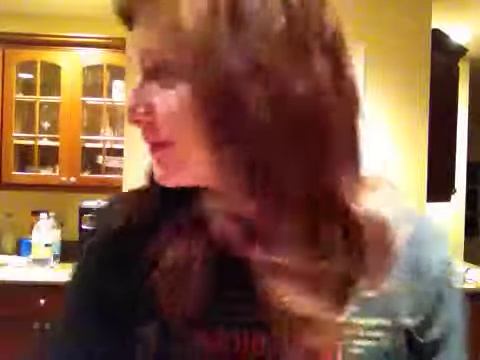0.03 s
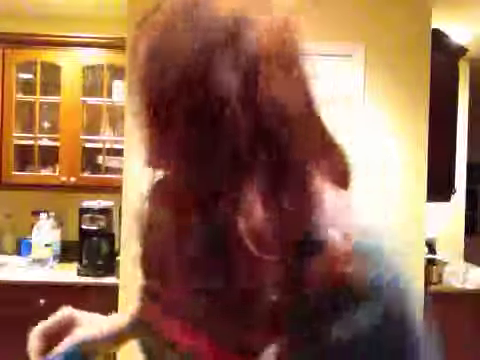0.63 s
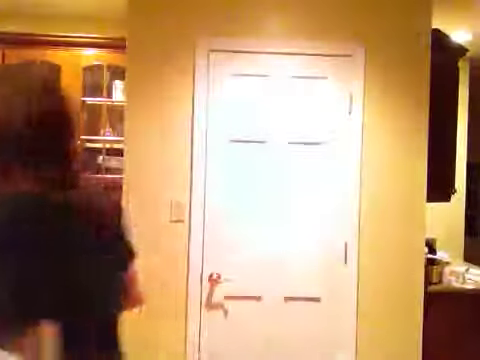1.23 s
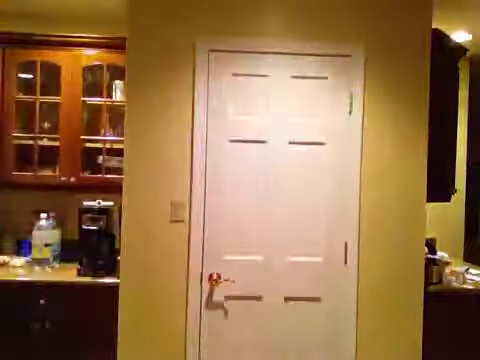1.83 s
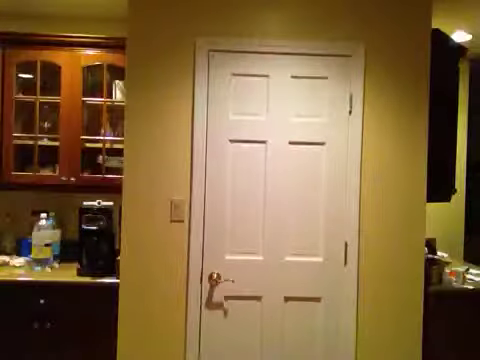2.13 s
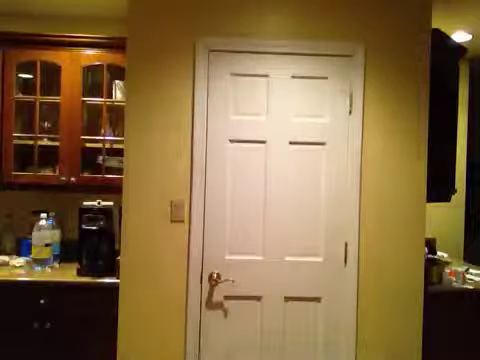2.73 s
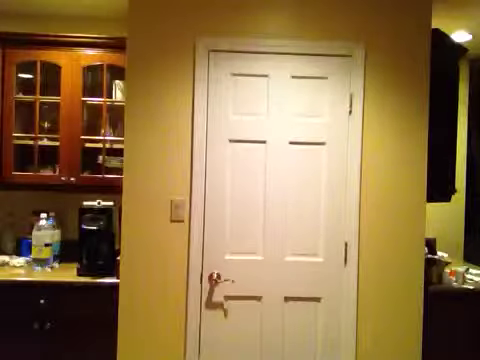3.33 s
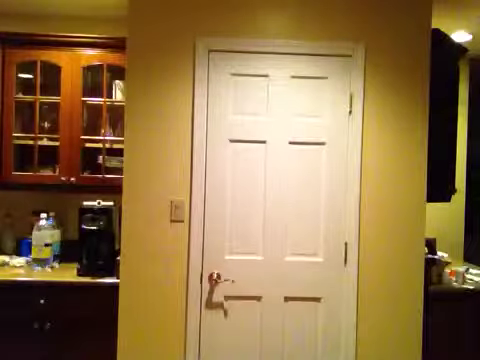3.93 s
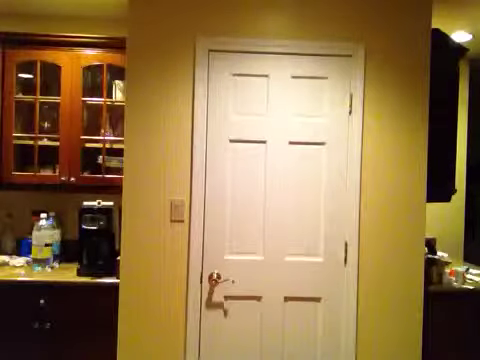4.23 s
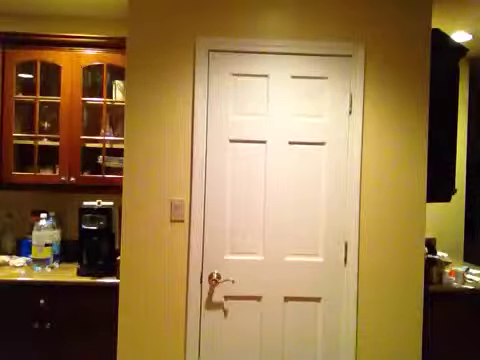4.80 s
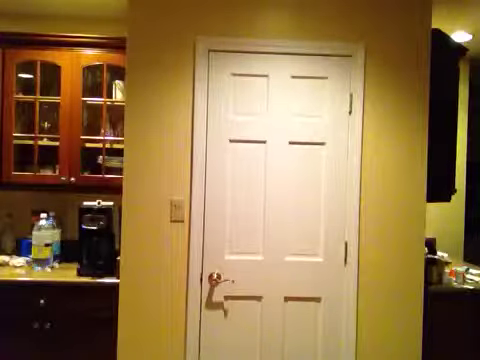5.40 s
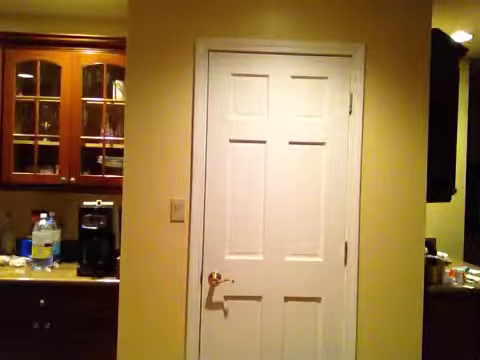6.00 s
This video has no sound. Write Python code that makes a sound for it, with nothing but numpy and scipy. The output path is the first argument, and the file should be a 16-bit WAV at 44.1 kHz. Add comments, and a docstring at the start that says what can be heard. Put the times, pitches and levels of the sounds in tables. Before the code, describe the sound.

Someone bumps a kitchen table getting up, walks off, and lightly knocks, clatters and drags things farther away.

```python
"""Small objects click and knock close by as someone gets up from a kitchen table and bumps it.
Clothes rustle in tiny catches and slips, and feet set the floor booming as the person walks off.
From across the room come a clatter of tumbling things, light knocks and the scrape of something
hollow being dragged. Each hit is a quickly dying burst of noise, and some things ring with a short
note. Far sounds carry more echo than near ones, and a quiet room murmur lies under it all."""
import sys
import numpy as np
from scipy import signal
from scipy.fft import rfft, irfft
from scipy.io import wavfile
from scipy.ndimage import uniform_filter1d

SR = 44100
rng = np.random.default_rng(int(sys.argv[2]) if len(sys.argv) > 2 else 0)


def wav_record(signal):
    """Record a signal, one row per channel, as 16-bit PCM in the file named by sys.argv[1]."""
    frames = np.transpose(np.atleast_2d(signal))
    bounded = np.clip(frames, -1, 1)
    # unit amplitude maps onto the largest positive 16-bit level
    quanta = np.round(bounded * 32767).astype(np.int16)
    wavfile.write(sys.argv[1], SR, quanta)


N = 266937  # samples, about 6 seconds

# how far away the person is: time_s, distance_m
DISTANCE = [(0, 0.52), (.78, 0.54), (1.05, 2.2), (6, 1.6)]
# things picked up, bumped and put down: start_s, level_db, hardness_db, decay_s (time to fall 60 dB)
KNOCKS = [(.013, -41, 0, 0.037), (0.038, -37, -0.5, 0.074), (.073, -36.5, 0.5, 0.026),
          (0.096, -37, -4.5, 0.06), (0.109, -38.5, -5.5, 0.13), (0.146, -43, -8, 0.066),
          (.199, -47, -2, .037), (0.262, -48.5, 3, 0.045), (0.3066, -39.5, -2, 0.078),
          (.3256, -29.5, 4, 0.019), (.416, -40.5, -2.5, 0.033), (.468, -37.5, 10.5, 0.023),
          (0.5315, -41, 3, 0.036), (.552, -38.5, 0.5, 0.046), (.574, -43, -1.5, 0.055),
          (.602, -40, 7, 0.036), (.619, -54, 12, .03), (0.6341, -30.5, 7.5, 0.016), (.697, -50, 3, .012),
          (.727, -56, 17, 0.02), (.744, -53.5, 15, .035), (.76, -36.5, 0, 0.019), (.777, -40.5, 8, 0.022),
          (.868, -54.5, -5.5, 0.13), (1.051, -46, -5, 0.02), (1.698, -55, 5.5, 0.029),
          (1.747, -51.5, 2.5, 0.027), (1.891, -53, 7, .08), (2.021, -53, -3, 0.07),
          (2.145, -54.5, 7.5, 0.037), (2.518, -49.5, 1.5, 0.022), (2.594, -50, -4.5, 0.025),
          (2.682, -53.5, -8.5, 0.022), (2.979, -53, 5, 0.041), (3.056, -56, 6, 0.03), (3.145, -53, -1, .03),
          (3.18, -57.5, 8.5, 0.027), (3.337, -53, 6.5, 0.046), (3.396, -53, 10, 0.016),
          (3.951, -55.5, 9, .028), (4.146, -60.5, -5, .025), (4.283, -59, 3.5, .02),
          (4.423, -46.5, -2.5, 0.038), (4.475, -61.5, 12.5, 0.026), (4.568, -50, -5.5, 0.017),
          (4.653, -44.5, 4.5, .07), (4.704, -46.5, 1, 0.056), (4.823, -46.5, 2, 0.031),
          (5.024, -51.5, -1.5, 0.12), (5.101, -51, 9, .025), (5.158, -50.5, 0.5, 0.09),
          (5.234, -51, -0.5, 0.046), (5.533, -65.5, -11, .05), (5.711, -66, 3, 0.039)]
def knocks(equal_echo_m=1.23, rise_share_at_1m=0.018, blur_power=1.45):
    """The farther away things are handled, the more each knock echoes and the softer it starts."""
    out = np.zeros(N)
    for start_s, level_db, hardness_db, decay_s in KNOCKS:
        distance_m = np.interp(start_s, *np.transpose(DISTANCE))
        echo_db = 20 * np.log10(distance_m / equal_echo_m)
        rise_share = rise_share_at_1m * distance_m ** blur_power
        add(out, start_s, hit(level_db, hardness_db, decay_s, echo_db, rise_share))
    return out


# a handful of things tumbling together: start_s, level_db, hardness_db
CLATTER_HITS = [(2.262, -33.5, 4.5), (2.268, -42.5, 5), (2.293, -37.5, 6.5), (2.306, -32.5, -2),
                (2.321, -35, 0.5), (2.391, -42.5, 0.5), (2.423, -37, 4.5), (2.432, -42.5, 8.5)]
# the pitches they ring at: pitch_hz, width_hz, gain_db
CLATTER_RESONANCES = [(454, 37, -2), (764, 17, -9), (880, 22, -1), (1640, 48, 4), (2200, 25, -7),
                      (2160, 20, -9)]
def clatter(decay_s=0.048, lowest_hz=340):
    """Light things fall against each other and ring; they are too small to give bass."""
    hits = np.zeros(N)
    for start_s, level_db, hardness_db in CLATTER_HITS:
        blow = hit(level_db, hardness_db, decay_s, echo_db=-1.5, rise_share=0.093,
                   body_db=-2, tick_db=-6.5)
        add(hits, start_s, blow)
    return resonate(band(hits, lowest_hz, 22000), CLATTER_RESONANCES)


# struck things that hold a short note: start_s, pitch_hz, peak_db
RINGS = [(0.295, 2320, -36), (0.5518, 2310, -34), (.607, 2330, -31), (.6974, 2450, -39), (1.748, 1760, -51),
         (2.392, 2250, -31), (2.519, 1680, -39), (2.683, 1155, -45), (3.396, 4600, -39.5),
         (4.424, 1770, -47), (4.572, 579, -47), (4.604, 549, -45), (5.024, 760, -41.5), (5.535, 820, -58)]
def ringing_things(decay_cycles=59):
    """Each struck thing fades over the same number of vibrations, so high notes die sooner."""
    out = np.zeros(N)
    for start_s, pitch_hz, peak_db in RINGS:
        add(out, start_s, room(note(pitch_hz, peak_db, decay_cycles / pitch_hz), echo_db=-12))
    return out


# the notes the kitchen table rings with: pitch_hz, peak_db, decay_s
TABLE_NOTES = [(94, -56, 0.071), (173, -40.5, 0.11), (265, -41, 0.068), (366, -35.5, 0.054),
               (634, -37, 0.028), (867, -24.5, .023), (3980, -20, 0.015)]
def table_bump(start_s=0.3262):
    """One heavy bump sets all the table's notes ringing at once."""
    out = np.zeros(N)
    chord = sum(note(*row) for row in TABLE_NOTES)
    add(out, start_s, room(band(chord, 88, 9000, order=2), echo_db=-17))
    return out


# steps and shifts of weight: start_s, pitch_hz, boom_db, scuff_db
FOOTSTEPS = [(.101, 168, -64, -55), (1.439, 182, -53.5, -58), (1.475, 178, -46.5, -60),
             (1.549, 179, -55, -60.5), (2.049, 153, -55.5, -56), (2.291, 168, -51, -58),
             (3.12, 162, -56, -57), (3.221, 166, -53, -57), (3.389, 154, -51, -50), (3.55, 100, -61, -70),
             (3.559, 160, -55.5, -59.5), (3.701, 168, -63, -57.5), (3.97, 164, -56, -70),
             (4.19, 151, -58, -66), (4.722, 178, -56, -60), (5.02, 186, -50.5, -50), (5.159, 187, -52, -52),
             (5.719, 169, -66.5, -76)]
def footsteps(width_hz=48, boom_decay_s=0.34, scuff_decay_s=0.28, rise_share=0.043, size=22000):
    """Each step makes the floor boom while the sole scuffs over it."""
    out, t = np.zeros(N), np.arange(size) / SR
    for start_s, pitch_hz, boom_db, scuff_db in FOOTSTEPS:
        push, grit = rng.standard_normal((2, size))
        # boards of slightly different pitch mix, so the boom wavers
        boards = band(push, pitch_hz - width_hz / 2, pitch_hz + width_hz / 2, order=2)
        boards = signal.hilbert(boards)[::-1]
        boom = boards.real / np.sqrt(abs(boards) + 1e-9)  # makes the wavering gentler
        floor = boom * rise_and_fall(t, boom_decay_s, rise_share)
        sole = coloured(band(grit, 250, 770, order=2)) * rise_and_fall(t, scuff_decay_s, rise_share)
        add(out, start_s, amp(boom_db) * unit_burst(floor) + amp(scuff_db) * unit_burst(sole))
    return band(out, 115, 3700, order=2)


# clothes as the person gets up and leaves: time_s, dull_db, crisp_db
CLOTHES_LEVELS = [(0.0, -40, -42), (0.128, -46.5, -46.5), (0.362, -50, -53.5), (0.5, -56.5, -49.5),
                  (0.636, -55, -55), (0.806, -55, -55), (0.964, -58.5, -67), (1.124, -64, -64),
                  (1.25, -68, -76)]
def clothes():
    """Cloth rustles close by and fades as the person walks off."""
    return room(long_rub(CLOTHES_LEVELS, dull_db=-2, rasp_db=-0.5, fizz_db=-6.5), echo_db=-6.5)


# brief rubs of hands, sleeves and things on the counter: start_s, length_s, level_db, crispness_db
RUBS = [(.96, 0.02, -58, 8), (1.317, 0.11, -66, 1.5), (1.44, 0.17, -61, -2.5), (1.55, 0.038, -63.5, 7.5),
        (1.824, 0.26, -57.5, 2), (2.247, 0.17, -44.5, 0.5), (2.433, 0.12, -53, -2), (2.603, 0.16, -63.5, 0),
        (2.868, 0.042, -59, 2.5), (2.954, 0.31, -64.5, 0), (3.32, 0.18, -59.5, -6), (3.55, 0.22, -70, -6),
        (3.753, 0.035, -60, 3), (3.83, 0.024, -61, 3), (4.007, 0.06, -60, -1.5), (4.37, 0.045, -61.5, -1),
        (5.55, 0.16, -75.5, 7), (5.834, 0.016, -72, -10.5), (5.959, 0.083, -66.5, -7)]
def short_rubs(stir_db=-74, stir_crispness_db=-5, dull_db=-1, fizz_db=-6, rise_share=0.27, decay_s=0.27):
    """Rubs speed up, hold and die away, over the faint stir of someone who never stands quite still."""
    t = np.arange(N) / SR
    gains = band_gains(stir_db, stir_crispness_db, dull_db, fizz_db)[:, None]
    for start_s, length_s, level_db, crispness_db in RUBS:
        rise = np.clip((t - start_s) / (rise_share * length_s), 0, 1)
        fall = amp(-60 * np.maximum(t - start_s - length_s, 0) / decay_s)
        rub_gains = band_gains(level_db, crispness_db, dull_db, fizz_db)[:, None]
        gains = np.hypot(gains, rub_gains * rise * fall)
    return room((gains * friction()).sum(0), echo_db=-5)


# a hollow thing dragged along: time_s, dull_db, crisp_db
SCRAPE_LEVELS = [(4.62, -59, -56.5), (4.666, -54.5, -45), (4.812, -50, -54.5), (4.826, -54, -46.5),
                 (4.954, -53.5, -51), (5.03, -47.5, -43), (5.068, -56.5, -54), (5.25, -65.5, -53),
                 (5.36, -84, -87)]
# the pitches it rings at: pitch_hz, width_hz, gain_db
SCRAPE_RESONANCES = [(870, 110, -4.5), (1790, 92, -9.5), (3030, 130, -4)]
def scrape():
    """Dragging a hollow thing makes it rasp and ring."""
    rub = long_rub(SCRAPE_LEVELS, dull_db=-4, rasp_db=-6, fizz_db=-9.5)
    return room(resonate(rub, SCRAPE_RESONANCES), echo_db=-2.5)


# the tone of the still room: pitch_hz, relative_db
ROOM_TONE = [(30, -27), (70, -19), (135, 3.5), (190, 3.5), (270, -4.5), (550, 1.5), (900, -10), (1300, -16),
             (2200, -12), (5000, -17.5), (9500, -22), (14500, -19)]
def room_murmur(level_db=-64):
    """Steady noise, strongest in the bass: the room's murmur and the microphone's hiss."""
    gains = amp(look_up(ROOM_TONE, np.fft.rfftfreq(N, 1 / SR)))
    return amp(level_db) * unit(irfft(rfft(rng.standard_normal(N)) * gains, N))


# how long the kitchen echoes: pitch_hz, decay_s
ECHO_DECAY = [(150, 0.4), (800, 0.32), (3000, 0.36), (7000, 0.35), (14000, 0.26)]
def echo_tail(size=24576, build_up_s=0.0019):
    """A fresh random spray of reflections with total energy 1; the highest pitches die first."""
    t = np.arange(size) / SR
    reflections = rng.choice([-1., 1.], size) * (rng.random(size) < .3) * (1 - np.exp(-t / build_up_s))
    hz, frame_s, spectrum = signal.stft(reflections, SR, nperseg=256)
    fade = amp(-60 * frame_s / look_up(ECHO_DECAY, hz)[:, None])
    echoes = signal.istft(spectrum * fade, SR, nperseg=256)[1]
    return echoes / np.linalg.norm(echoes)


def room(x, echo_db):
    """The direct sound plus its reflections."""
    return x + amp(echo_db) * signal.fftconvolve(x, echo_tail())[:len(x)]


# the broad tone shared by table, cabinets and microphone: pitch_hz, gain_db
SHARED_TONE = [(40, -40), (110, -16), (175, -2.5), (260, -16), (350, -3.5), (450, -0.5), (640, -0.5),
               (1130, 1), (1300, -8), (1550, -0.5), (4600, -0.5), (5300, -7), (13500, -11.5), (15500, -8)]
# their resonances: pitch_hz, width_hz, gain_db
SHARED_RESONANCES = [(831, 48, 5.5), (1768, 105, 6), (2280, 200, 8.5), (2897, 200, 4), (4020, 170, -0.5),
                     (4740, 40, 4), (11900, 2000, 5)]
def coloured(x, size=4096):
    """Gives a sound the tone of the table, cabinets and microphone."""
    hz = np.fft.rfftfreq(size, 1 / SR)
    peaks_db = sum(db / (1 + (2 * (hz - pitch) / width) ** 2) for pitch, width, db in SHARED_RESONANCES)
    gain_db = look_up(SHARED_TONE, hz) + peaks_db
    log_gain = np.log(amp(np.r_[gain_db, gain_db[-2:0:-1]]))
    taps = np.fft.ifft(np.exp(np.conj(signal.hilbert(log_gain)))).real  # rings only after a hit
    return signal.fftconvolve(x, taps[:size // 2])[:len(x)]


def hit(level_db, hardness_db, decay_s, echo_db, rise_share, body_db=-3, tick_db=-6, size=24576):
    """A burst of quickly dying vibration; hard hits tick, soft ones sound hollow."""
    t = np.arange(size) / SR
    force = rise_and_fall(t, decay_s, rise_share)
    bounce = amp(-7) * np.interp(t - 0.0038, t, force)  # the nearest surface throws the sound back
    force = np.hypot(force, bounce)
    force /= np.linalg.norm(force)
    direct = force * rng.choice([-1., 1.], size)
    # the room fills up as the hit gives off its energy
    echo = amp(echo_db) * echo_tail(size) * np.sqrt(np.cumsum(force ** 2))
    gains = band_gains(level_db, hardness_db, body_db, tick_db)
    return sum(gain * unit_burst(part) for gain, part in zip(gains, three_bands(direct + echo)))


def note(pitch_hz, peak_db, decay_s, rise_share=0.031, size=16000):
    """One pure tone that dies away."""
    t = np.arange(size) / SR
    strength = rise_and_fall(t, decay_s, rise_share)
    return amp(peak_db) * strength / strength.max() * np.sin(2 * np.pi * pitch_hz * t)


def friction(slips_per_s=1800, spread_db=2.0, clump_db=2):
    """Rubbing surfaces catch and slip: clumps of tiny uneven clicks, split into three bands."""
    grip = unit(uniform_filter1d(uniform_filter1d(rng.standard_normal(N), size=400), size=300))
    sizes = amp(spread_db * np.minimum(rng.exponential(1, N), 4) + clump_db * np.clip(grip, -2, 2))
    slips = sizes * rng.choice([-1., 1.], N) * (rng.random(N) < slips_per_s / SR)
    return np.array([unit(part) for part in three_bands(slips)])


def long_rub(curve, dull_db, rasp_db, fizz_db, fade_s=0.029):
    """Friction whose dull and crisp parts each follow their own loudness curve."""
    t = np.arange(N) / SR
    times_s, *levels_db = np.transpose(curve)
    dull, crisp = (amp(np.interp(t, times_s, db)) for db in levels_db)
    rub, rasp, fizz = friction()
    moving = np.clip(1 + np.minimum(t - times_s[0], times_s[-1] - t) / fade_s, 0, 1)
    return moving * (amp(dull_db) * dull * rub + crisp * (amp(rasp_db) * rasp + amp(fizz_db) * fizz))


def resonate(x, resonances):
    """An object boosts the pitches it naturally rings at."""
    return x + sum(amp(db) * signal.lfilter(*signal.iirpeak(hz, hz / width, SR), x)
                   for hz, width, db in resonances)


def three_bands(x):
    """Colours a sound, then splits it into low body, middle clack and high tick."""
    x = coloured(x)
    return band(x, 41, 1500), band(x, 1556, 4400), band(x, 5790, 14100)


def band_gains(level_db, hardness_db, body_db, tick_db):
    """Gains for body, clack and tick: harder things have less body and more tick."""
    return amp([level_db + body_db - 0.97 * hardness_db, level_db, level_db + tick_db + hardness_db])


def rise_and_fall(t, decay_s, rise_share):
    """The loudness of a hit over time: the longer it lasts, the softer it starts."""
    return (1 - np.exp(-t / (rise_share * decay_s))) * amp(-60 * t / decay_s)


def band(x, low_hz, high_hz, order=3):
    """Keeps the pitches between two limits."""
    edges_hz = [low_hz, min(high_hz, .49 * SR)]
    return signal.sosfilt(signal.butter(order, edges_hz, "band", fs=SR, output="sos"), x)


def amp(db):
    """Turns decibels into a gain."""
    return 10 ** (np.asarray(db) / 20)


def unit(x):
    """Scales a sound to an average (rms) level of 1."""
    return x / np.sqrt(np.mean(x ** 2) + 1e-20)


def unit_burst(x, size=300):
    """Scales a burst so that its loudest few milliseconds have level 1."""
    return x / np.sqrt(uniform_filter1d(x ** 2, size).max() + 1e-20)


def look_up(table, hz):
    """Reads between a table's rows, giving each octave equal space."""
    pitches_hz, values = np.transpose(table)
    return np.interp(np.log(hz + 1), np.log(pitches_hz + 1), values)


def add(mix, start_s, sound):
    """Mixes a sound in at its start time."""
    part = mix[max(round(start_s * SR), 0):][:len(sound)]
    part += sound[:len(part)]


def scene():
    """All the sounds together in one channel."""
    impacts = knocks() + clatter() + ringing_things() + table_bump() + footsteps()
    return (impacts + clothes() + short_rubs() + scrape() + room_murmur())[None]


def record(dry, cutoff_hz=15450):
    """The recorder cuts off the very highest treble."""
    low_pass = signal.firwin(511, cutoff_hz, window=("kaiser", 9), fs=SR)
    return signal.oaconvolve(dry, low_pass[None], "same")


dry = scene()
out = record(dry)
wav_record(out)
```